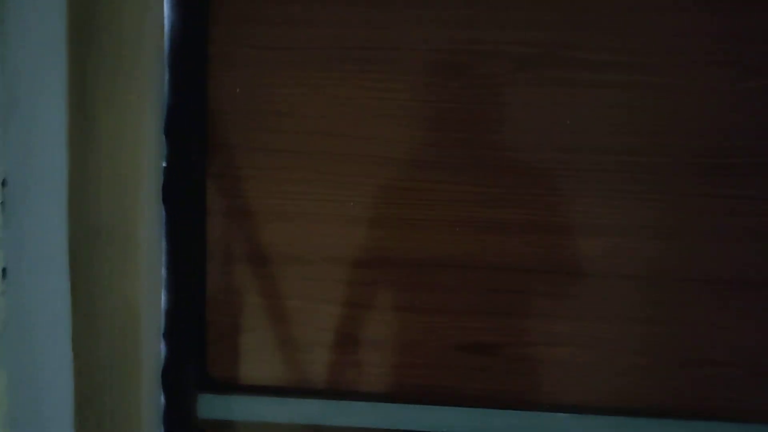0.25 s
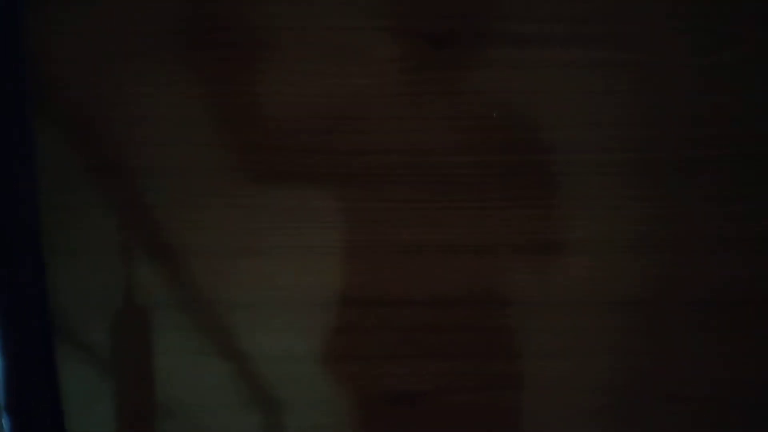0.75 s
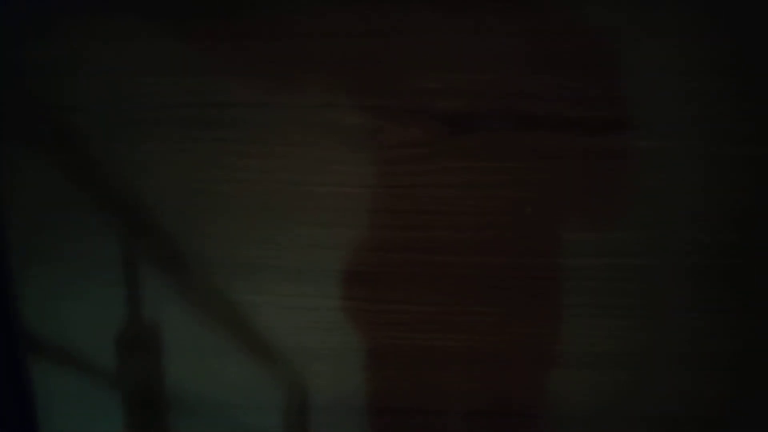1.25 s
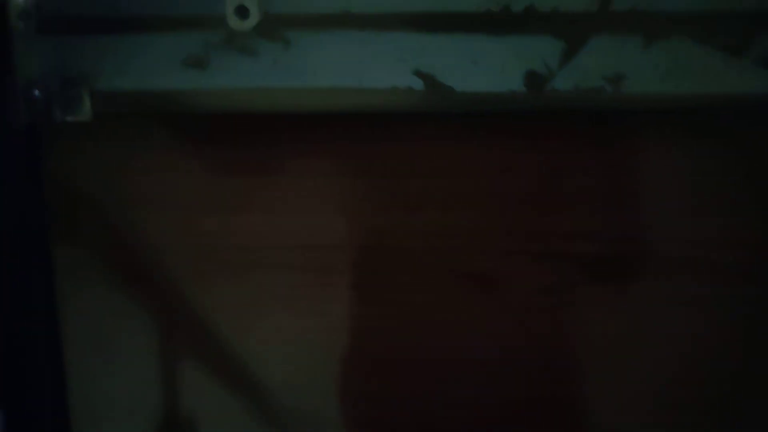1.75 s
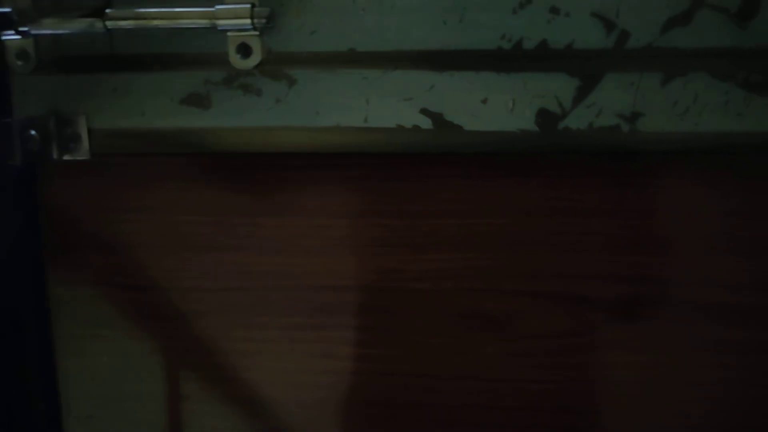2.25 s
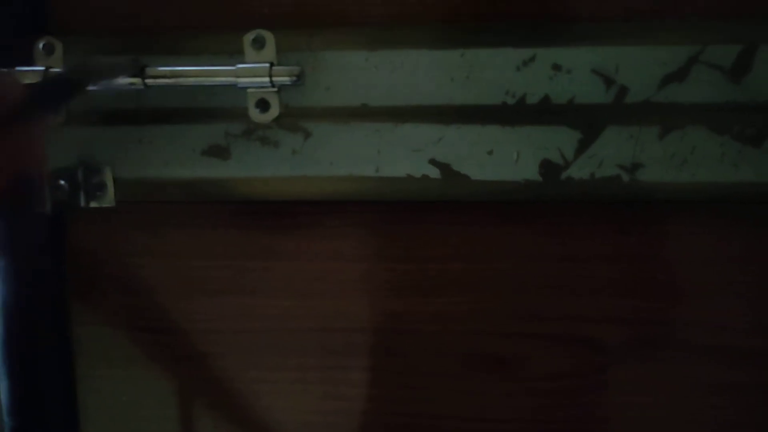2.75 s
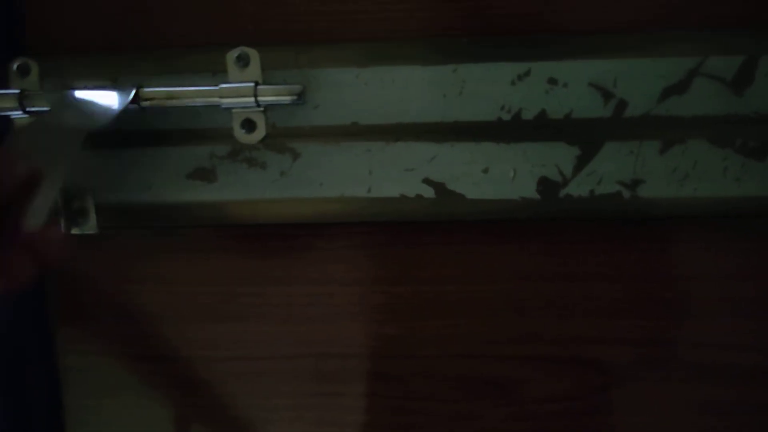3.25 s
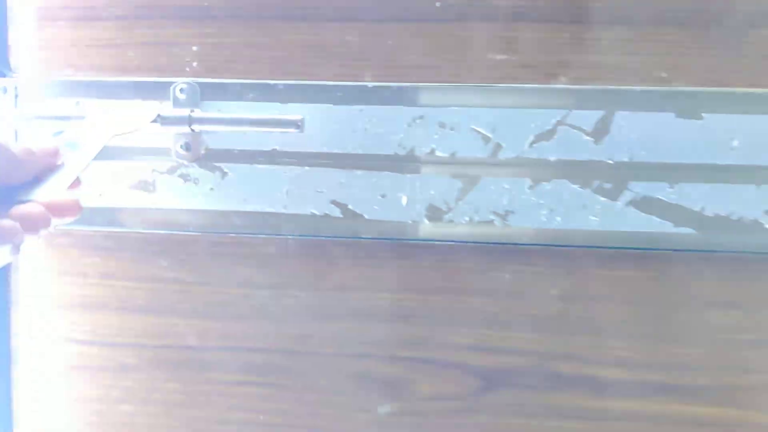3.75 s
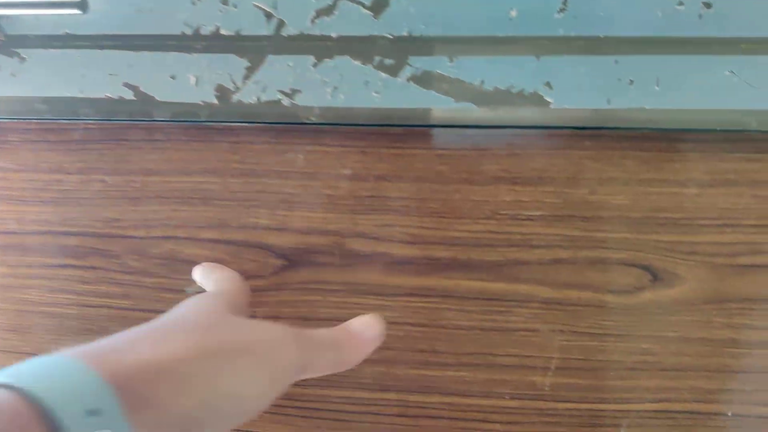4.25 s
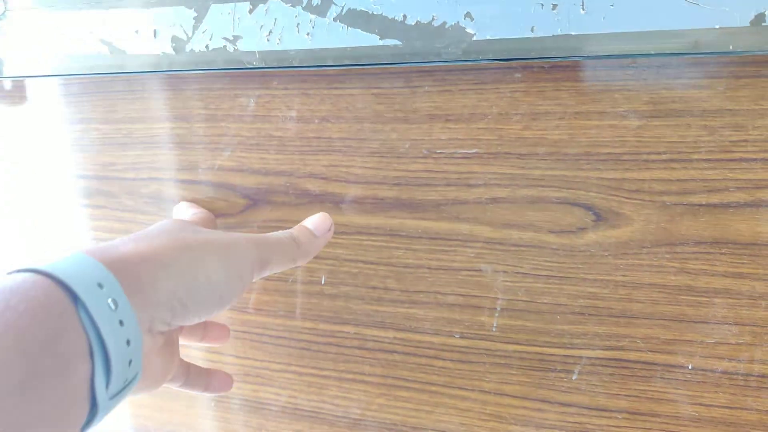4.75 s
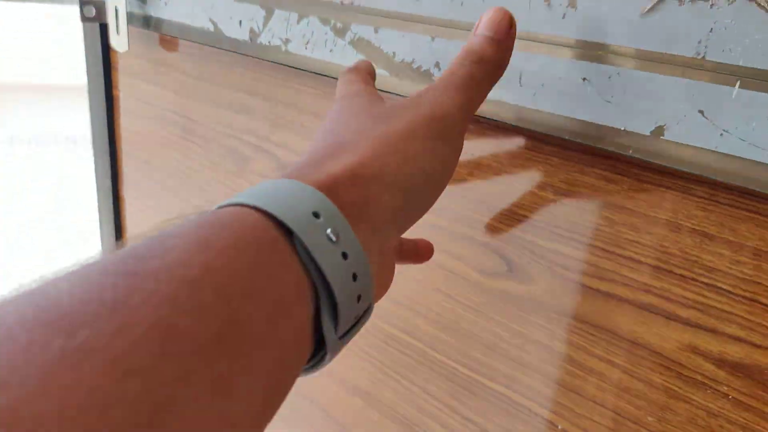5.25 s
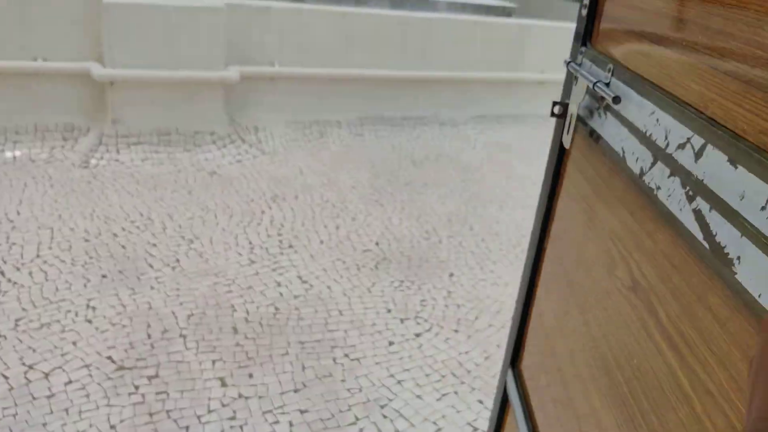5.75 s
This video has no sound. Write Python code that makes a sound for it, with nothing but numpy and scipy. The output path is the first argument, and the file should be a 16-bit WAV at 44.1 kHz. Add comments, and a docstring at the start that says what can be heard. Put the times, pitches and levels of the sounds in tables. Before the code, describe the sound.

Close handheld microphone with low grip rumble and sleeve rustle. Quiet footsteps echo between hard walls, then soft thuds and high metallic squeaks as a stiff bolt is loosened. It shoots back loudly, the wooden panel booming, and a bright metal clack rings afterwards. Uneven wind gusts overload the microphone, shoes scuff, and the steel door clatters at the end.

```python
"""Shoes scuff up the last steps of an echoing stairwell (noise bursts) to a wooden door in a steel frame.
Dull knocks stir the panel and the bolt squeaks (gliding tones) as it is worked loose; it shoots back with
a bang (noise through resonances), and the handle drops and rings (beating sines).
The door swings open: wind hits the close ports of the hand-held microphone (noise and pressure puffs), shoes
scuff again and the steel rattles. A limiter dips the level briefly at each loud peak."""
import sys
import numpy as np
from scipy import signal
from scipy.fft import rfft, irfft, next_fast_len
from scipy.io import wavfile
from scipy.ndimage import uniform_filter1d, minimum_filter1d, map_coordinates

SR = 44100
rng = np.random.default_rng(int(sys.argv[2]) if len(sys.argv) > 2 else 0)


def log_audio(samples):
    """Write samples as a 16-bit WAV file to the path given in sys.argv[1]."""
    # one column per channel
    frames = np.atleast_2d(samples).T
    # limit to full scale, then quantise
    limited = np.clip(frames, -1, 1)
    pcm = np.round(limited * 32767).astype(np.int16)
    wavfile.write(sys.argv[1], SR, pcm)


N = 264644  # length [samples]

# clacks of bolt and frame, and one clunk with the footstep at 4.98 s: (time [s], level [dB], t60 [s],
# resonance of the struck part [Hz], height of that resonance [dB], left over right [dB])
CLACKS = [(3.316, -30, 0.18, 4000, -3, 1), (3.434, -23, 0.18, 6900, -2, -3),
          (3.4441, -3, 0.034, 2800, 3, -3), (3.455, -13.5, 0.07, 2060, 2, 5),
          (3.4797, -5.5, 0.016, 1340, 16, -9), (3.49, 1, 0.025, 9400, 9.5, -2.5),
          (3.892, -26.5, 0.042, 2415, 7, 3), (4.0533, 6.5, 0.0085, 6500, 4, -1.5),
          (4.39, -26, 0.075, 2770, 6.5, 0), (4.7645, -36.5, 0.085, 5330, 31, -1),
          (4.9782, -23.5, 0.12, 1710, 31, -3), (5.8834, -16, 0.09, 1320, 10, 0),
          (5.8905, -7.5, 0.08, 6950, 2, -12), (5.906, -6, 0.051, 4400, 0.5, -5),
          (5.918, -13, 0.023, 4500, -13, -1), (5.9263, 2, 0.024, 2690, 12, -4),
          (5.951, 6.5, 0.011, 3900, 16, -2.5), (5.956, -5.5, 0.015, 5200, 4, -6),
          (5.968, -12, 0.033, 7000, 7, -1)]
# colour of the clacks: (frequency [Hz], level [dB])
STEEL_COLOUR = [(80, 11.5), (400, 7), (900, -2.5), (1600, 2.5), (3200, 3.5), (5500, 1), (8300, 0.5),
                (10500, -8), (15500, -15)]
# modes of the steel door frame: (frequency [Hz], level [dB], t60 [s])
FRAME_MODES = [(687, 0, .16), (965, 4, .11), (1385, -6, .09), (1510, -6, .11), (2320, -4, .13),
               (3085, -5, .09), (3750, -7, .09), (4250, -8, .09), (4950, -9, .08), (5415, -9, .08),
               (7690, -7, .09)]
# light ticks of the loose bolt in its guides: (time [s], level [dB])
TICKS = [(1.107, -43), (3.014, -44), (3.316, -29.5), (3.337, -34), (3.8732, -23), (3.9612, -26),
         (5.631, -23.5)]
# colour of the small part that every tick rings: (frequency [Hz], level [dB])
GUIDE_COLOUR = [(1000, -13), (5000, 2), (6900, 3.5), (9300, -0.5), (11200, -4), (13000, -4), (15500, -16)]
# blows on the bolt's handle: (time [s], level [dB])
HANDLE_BLOWS = [(3.4942, -22), (4.0526, -6.5)]
# handle modes, each a close pair: (frequency [Hz], level [dB], t60 [s], beat [Hz], left over right [dB])
HANDLE_MODES = [(468, -29, .9, 1.4, 0), (2266, -30, .65, 3, 3), (2918, -33, .65, 5.7, 0),
                (3273, -31, .65, 4, 4), (5693, -15, .58, 4.6, 11), (7969, -20.5, .95, 8.1, -12),
                (9661, -23, .7, 6.6, -14)]
# blows that shake the door: (time [s], thump level [dB], boom level [dB], boom t60 [s])
BANGS = [(3.4453, -5, -21.5, 1.03), (3.4908, -1, -22, 2.33), (4.0534, -37, -43, 1.2),
         (5.927, -8, -23, 0.22)]
# dull knocks of hand or heel: (time [s], level [dB], cut-off set by the softness [Hz])
KNOCKS = [(2.066, -21, 2000), (2.553, -25.5, 1490), (2.746, -33, 334), (2.778, -22.5, 1800),
          (2.9605, -26, 1190), (2.986, -26.5, 328), (3.013, -25.5, 1500), (3.311, -26, 900),
          (5.572, -19, 1500)]
# resonances of the door panel: (frequency [Hz], width [Hz], level [dB])
PANEL_MODES = [(160.6, 6.4, 5), (187, 23, 5.5), (254.5, 25, 1.5), (383.4, 10, 6), (432, 48, 1.5),
               (614, 13, 1), (688, 53, 3), (742, 43, 3.5), (830, 23, -7), (1090, 31, -7), (1154, 61, -7),
               (1500, 51, -12), (2380, 160, -14.5)]
# stick-slip squeaks: (centre time [s], pitch [Hz], relative level [dB], half-length [s], pitch jitter [Hz],
# sag [Hz per half-length], left over right [dB], level sent to the room [dB])
SQUEAKS = [(2.168, 9010, -4, 0.0052, 45, 22, -29, -11.5), (2.842, 9120, -38, 0.009, 40, 0, -34, -12),
           (2.988, 5490, -29, 0.007, 100, 160, 14, -10), (3.229, 5450, -18, 0.0038, 69, 110, 20, -11),
           (4.3962, 1639, -12.5, 0.0031, 112, 6, 6, -4)]
# footfalls and scuffs: (time [s], grit level [dB], thud level [dB], t60 [s], slide of the sole [s],
# brightness of the grit [dB per octave], heel tap over the grit [dB])
STEPS = [(0.0, -46.5, -44.5, 0.17, 0, 0, 3), (0.099, -41.5, -48, 0.074, 0, 3, -2),
         (0.577, -29, -49, 0.12, 0.0057, 0.66, 2), (0.625, -40.5, -54, 0.11, 0.023, 6, -3),
         (1.362, -27.5, -27.5, 0.094, 0, -2, 4), (4.974, -33.5, -24, 0.13, 0.022, -1.5, 5),
         (5.151, -37, -67, 0.26, 0.0066, 5.5, -2), (5.586, -31.5, -29, 0.13, 0.007, 1.5, 2)]
# colour of grit, and of the sleeve's rustle: (frequency [Hz], level [dB])
GRIT_COLOUR = [(300, 0.5), (1200, -3), (2300, 0.5), (3200, -0.5), (5400, -0.5), (8300, -3), (10500, -10.5),
               (15500, -21)]
# colour of the dull thuds and knocks: (frequency [Hz], level [dB])
THUD_COLOUR = [(40, -11), (110, 8.5), (450, 2.5), (750, 2), (1000, 0.5), (1500, -3), (2600, -9.5),
               (6000, -23), (15000, -64)]
# gusts through the opening door: (time at full strength [s], hold [s], level [dB], left over right [dB])
GUSTS = [(4.755, 0.041, -30.5, -34), (5.075, 0.011, -27, 19), (5.207, 0.104, -12.5, 24),
         (5.347, 0.056, -7, 35), (5.433, 0.17, -18.5, 12), (5.688, 0.2, -30, 15), (5.89, 0.014, -16, -4)]
# colour of the eddies at the microphone: (frequency [Hz], level [dB])
BUFFET_COLOUR = [(8, -20), (25, 6.5), (70, 2), (140, -1), (260, -8), (450, -17.5), (800, -35), (1500, -67),
                 (4000, -97)]
# hardest eddies popping on the ports: (time [s], level before overload [dB], length [s], left over right [dB])
POPS = [(5.078, -12.5, 0.0032, 29), (5.199, -9.5, 0.0012, 30), (5.2488, -5, 0.0012, 36),
        (5.267, -6, 0.00079, 33), (5.289, -5.5, 0.00068, 32), (5.336, -11, 0.0024, -20),
        (5.343, -11, 0.0007, 30), (5.3595, -4.5, 0.0012, 30), (5.384, -2.5, 0.0014, 30),
        (5.413, -9, 0.00067, 32), (5.598, -6, 0.0027, 14), (5.68, -9, 0.0028, -17),
        (5.701, -16, 0.0012, 19), (5.775, -16, 0.003, 17), (5.79, -14, 0.0025, 20),
        (5.836, -13.5, 0.0017, 23), (5.889, -1.5, 0.0032, -1), (5.916, -12, 0.0049, -17)]
# slow shake of the carrying hand: (time [s], relative level [dB])
MOTION = [(0.0, -47), (0.03, -57), (1.1, -41), (1.27, -34.5), (1.45, -54), (1.59, -24.5), (2.57, -26.5),
          (2.64, -31.5), (3.23, -23), (4.33, -33.5), (4.41, -25), (5.01, -38.5), (5.33, -34), (5.66, -26.5),
          (5.93, -28.5), (6.0, -23)]
# rumble of the grip, strongest while the bolt is worked: (time [s], level [dB])
GRIP = [(0, -38), (.4, -44), (1.2, -41.5), (1.55, -36), (2.45, -35.5), (3, -30.5), (3.45, -31.5),
        (3.8, -38.5), (4.4, -34.5), (5, -43)]
# colour of the grip rumble: (frequency [Hz], level [dB])
RUMBLE_COLOUR = [(15, 0), (28, 0), (45, -1), (70, -5.5), (97, 4), (130, -14.5), (165, -1), (205, -11.5),
                 (270, -8.5), (420, -21.5), (700, -46), (1500, -52), (4000, -63)]
# level sent to the stairwell's echo, falling steadily, then faster near the end: (time [s], level [dB])
ECHO_SEND = [(0, 4.5), (5.2, -5), (5.8, -10)]
# decay of the stairwell: (frequency [Hz], t60 [s])
STAIRWELL_T60 = [(100, 0.25), (500, 1.25), (2000, 1.04), (5500, 0.92), (9000, 0.68), (15000, 0.59)]
# colour of the background air: (frequency [Hz], level [dB])
AIR_COLOUR = [(40, -19), (60, -8), (110, 13), (210, -20), (400, 9), (800, 2), (1400, -6), (2300, -13),
              (3500, -9), (5300, -3), (6800, -24), (8600, -7), (10500, -44), (16000, -43)]
# likeness of the two ports in most noises: (frequency [Hz], correlation [0 to 1])
ALIKE = [(20, 1), (300, 0.89), (700, 0.51), (1500, 0), (5000, 0)]
# treble balance of the microphone ports: (frequency [Hz], left over right [dB])
PORT_BALANCE = [(7000, 1.5), (9000, -27.5), (11000, -8.5), (16000, -5)]

# bolt and frame
CRACK_RISE_S, CRACK_FULL_S = 0.0004, 0.04  # a clack with a t60 below the second rings the frame less
RESONANCE_OCTAVES = 1.13  # half-width of a struck part's resonance
FRAME_DB, FRAME_FOCUS_DB = -25, 10  # frame under the clack; lift of modes near the struck part's resonance
TICK_T60_S, TICK_PAN_DB = 0.026, -8  # to the right
TWIN_SHARE = 0.75  # weaker mode of each handle pair
# door
CHATTER_DB, CHATTER_RATE = 2, 130  # the booming panel chatters in its frame: depth, changes a second
KNOCK_CYCLES = 50  # t60 in cycles of the cut-off: a softer knock lasts longer
KNOCK_BOOM_DB = -36  # each knock stirs the panel alike
# squeaks
SQUEAK_LEAD_DB, SQUEAK_LEAD_S = -17.5, 0.015  # a faint whistle leads into each squeak
OVERTONE_SHARE = 0.15
# footsteps
HEEL_LEAD_S, HEEL_T60_S = 0.0155, 0.062  # the heel taps just before the sole
SOLE_RISE_S = 0.00027
GRIT_GRAIN_DB, GRIT_GRAIN_RATE = 3, 600  # depth, changes a second
# wind
GUST_ATTACK_S, GUST_RELEASE_S = 0.009, 0.032
DRAUGHT_FROM_S, DRAUGHT_RISE_S, DRAUGHT_DB = 4.86, 0.45, -39  # steady flow as the door opens
EDDY_SWELL_DB = 2.8
PUFFS_PER_S, PUFF_S, PUFF_SPREAD, PUFF_DB = 55, 0.0012, 0.31, 2  # length in a strong gust, its log spread
STRONG_GUST_DB = -8
PUFF_SLOWS = 0.49  # a weaker flow carries its eddies past more slowly, by this power of its strength
PORT_OVERLOAD_DB = 3  # the wind's pressure flattens out here
# hand on the microphone
TREMOR_HZ, TREMOR_WANDER_HZ, TREMOR_DB = 15.3, 2.5, 2
JOLT_SHARE = 0.22  # random jolts in the shake
GRIP_SWELL_DB, RUSTLE_SWELL_DB = 1.6, 1.8
USUAL_MOTION_DB = -27
SLEEVE_DB, SLEEVE_FOLLOWS = -46, 0.29  # rustle at the usual motion; dB more per dB of movement
TOP_HZ = 16200  # band limit of the recorder


def amp(db):
    """Amplitude of a level in dB."""
    return 10 ** (np.asarray(db) / 20)


def unit(x):
    """x scaled to an rms of 1."""
    return x / np.sqrt(np.mean(x ** 2) + 1e-20)


def along(points, hz):
    """Interpolate (Hz, value) points on a log axis."""
    f, v = np.transpose(points)
    return np.interp(np.log(hz + 1), np.log(f + 1), v)


def curves(rows):
    """One value per sample for each column after the time."""
    s, *cols = np.transpose(rows)
    return np.array([np.interp(np.arange(N) / SR, s, c) for c in cols])


def wobble(rate, size=N):
    """A smooth random curve, rate knots a second."""
    knots = rng.standard_normal(size // 20)
    return map_coordinates(knots, [np.arange(size) * rate / SR], order=2, mode="wrap")


def colour(points):
    """Gain against frequency for (Hz, dB) points."""
    return lambda hz: amp(along(points, hz))


def decay(t, t60):
    """Exponential fall of 60 dB in t60 seconds."""
    return np.exp(-np.log(1000) * t / t60)


def noise(gain, size=N, alike=ALIKE):
    """Coloured stereo noise of rms 1, as alike at the two close ports as the likeness curve says."""
    hz = np.fft.rfftfreq(size, 1 / SR)
    turn = np.arccos(np.clip(along(alike, hz), -1, 1)) / 2
    random_phase = np.exp(2j * np.pi * rng.random((2, len(hz))))
    mid, side = irfft(random_phase * gain(hz) * [np.cos(turn), np.sin(turn)], size)
    return unit(np.array([mid + side, mid - side]))


def burst(gain, rise, t60, size=SR // 2, hold=0):
    """Coloured noise that swells, holds and dies away."""
    t = np.arange(size) / SR
    return noise(gain, size) * (1 - np.exp(-t / rise)) * decay(np.maximum(t - hold, 0), t60)


def pan(db):
    """Left and right gains of constant power."""
    return unit(amp([[db / 2], [-db / 2]]))


def add(track, s, sound):
    """Mix a sound in from time s."""
    part = track[:, max(round(s * SR), 0):][:, :sound.shape[-1]]
    part += sound[..., :part.shape[1]]


def filtered(x, gain):
    """x times a gain against frequency."""
    m = next_fast_len(N + SR // 2)
    return irfft(rfft(x, m) * gain(np.fft.rfftfreq(m, 1 / SR)), m)[:, :N]


def bolt():
    """Clacks and a clunk ring the frame (a brief one rings it less); light ticks as the bolt shifts in its guides."""
    out = np.zeros((2, N))
    for s, db, t60, centre_hz, height_db, pan_db in CLACKS:
        add(out, s, amp(db) * pan(pan_db) * crack(t60, centre_hz, height_db))
        add(out, s, amp(db + FRAME_DB) * min(1, t60 / CRACK_FULL_S) * frame_ring(centre_hz))
    for s, db in TICKS:
        add(out, s, amp(db) * pan(TICK_PAN_DB) * burst(colour(GUIDE_COLOUR), CRACK_RISE_S, TICK_T60_S))
    return out


def crack(t60, centre_hz, height_db):
    """One hard contact: a noise burst in the resonance of the part it strikes."""
    def gain(hz):
        return colour(STEEL_COLOUR)(hz) * struck_part(hz, centre_hz, height_db)
    return burst(gain, CRACK_RISE_S, t60, size=SR // 5)


def struck_part(hz, centre_hz, height_db):
    """Gain of the broad resonance of the part that is struck."""
    octaves = np.log2((hz + 1) / centre_hz)
    return amp(height_db * np.exp(-(octaves / RESONANCE_OCTAVES) ** 2))


def frame_ring(centre_hz):
    """Decaying frame modes, lifted near the struck part's resonance; strength and phase vary by blow and port."""
    t = np.arange(SR // 3) / SR
    ring = 0
    for hz, db, t60 in FRAME_MODES:
        strength = struck_part(hz, centre_hz, FRAME_FOCUS_DB) * amp(db + 2 * rng.standard_normal((2, 1)))
        ring = ring + strength * decay(t, t60) * np.sin(2 * np.pi * (hz * t + rng.random((2, 1))))
    return ring


def handle():
    """Blows ring the bolt's handle; each mode beats with a weaker twin, so it fades and swells again."""
    out, t = np.zeros((2, N)), np.arange(SR) / SR
    for s, db in HANDLE_BLOWS:
        for hz, mode_db, t60, beat_hz, pan_db in HANDLE_MODES:
            phase = 2 * np.pi * (hz * t + rng.random((2, 1)))  # each port hears it out of step
            pair = np.sin(phase) + TWIN_SHARE * np.sin(phase + 2 * np.pi * beat_hz * t)
            add(out, s, amp(db + mode_db) * pan(pan_db) * pair * decay(t, t60))
    return out


def door():
    """The panel thumps and booms under the blows; dull knocks stir mostly its low modes."""
    out = np.zeros((2, N))
    for s, thump_db, boom_db, t60 in BANGS:
        add(out, s, amp(thump_db) * burst(panel, 0.00005, 0.019))
        chatter_db = CHATTER_DB * wobble(CHATTER_RATE, size=2 * SR)
        add(out, s, amp(boom_db + chatter_db) * burst(panel, 0.00047, t60, size=2 * SR))
    for s, db, soft_hz in KNOCKS:
        def soft_thud(hz):
            return colour(THUD_COLOUR)(hz) / np.hypot(1, (hz / soft_hz) ** 2)
        add(out, s, amp(db) * burst(soft_thud, 0.00069, KNOCK_CYCLES / soft_hz))
        add(out, s, amp(KNOCK_BOOM_DB) * burst(lambda hz: panel(hz) / (1 + (hz / 420) ** 2), 0.0027, 0.3))
    return out


def panel(hz):
    """Gain of the door panel: the power sum of its resonances."""
    power = sum(amp(db) ** 2 / (1 + ((hz * hz - c * c) / (hz * w + 1)) ** 2) for c, w, db in PANEL_MODES)
    return np.sqrt(power)


def squeaks():
    """Dry metal sticks and slips in short tones, most sagging in pitch; returned at the ports and as sent to the room."""
    near, sent = np.zeros((2, N)), np.zeros((2, N))
    t = np.arange(-SR // 10, SR // 10) / SR
    for s, hz, db, half, jitter_hz, sag_hz, pan_db, room_db in SQUEAKS:
        pitch = hz - sag_hz * np.clip(t / half, 0, 2) + jitter_hz * wobble(900, size=len(t))
        phase = 2 * np.pi * np.cumsum(pitch) / SR
        overtones = sum(np.sin(k * phase) / (1 + (k * hz / 3000) ** 2) for k in range(2, 6) if k * hz < TOP_HZ)
        lead = amp(SQUEAK_LEAD_DB) * np.exp(-2 * (t / SQUEAK_LEAD_S + 1) ** 2)
        swell = 1 / np.cosh(t / half) + lead
        tone = (np.sin(phase) + OVERTONE_SHARE * overtones) * amp(db - 4) * swell
        add(near, s + t[0], pan(pan_db) * tone)
        add(sent, s + t[0], amp(room_db) * tone)
    return near, sent


def footsteps():
    """The heel taps, then the sole slides over grit on the stone and thuds under the weight."""
    out = np.zeros((2, N))
    for s, grit_db, thud_db, t60, slide, tilt_db, heel_db in STEPS:
        def grit(hz):
            return amp(along(GRIT_COLOUR, hz) + tilt_db * np.log2(np.maximum(hz, GRIT_COLOUR[0][0])))
        add(out, s - HEEL_LEAD_S, amp(grit_db + heel_db) * burst(grit, 0.0021, HEEL_T60_S))
        add(out, s, amp(grit_db) * burst(grit, SOLE_RISE_S, t60, hold=slide))
        add(out, s, amp(thud_db) * burst(colour(THUD_COLOUR), SOLE_RISE_S, t60))
    return out * amp(GRIT_GRAIN_DB * wobble(GRIT_GRAIN_RATE))


def wind():
    """Eddies and puffs buffet the two close ports; puffs are shorter in a strong gust, and the ports overload."""
    flow = airflow()
    swell_db = EDDY_SWELL_DB * np.array([wobble(50), wobble(50)])
    eddies = amp(swell_db) * noise(colour(BUFFET_COLOUR), alike=[(30, 0.73)])
    puffs = np.zeros((2, N))
    for k, (early, stretch, side) in enumerate(rng.standard_normal((N // SR * 100, 3))):
        s = N / SR - (k + early / 2) / PUFFS_PER_S  # laid out from the end backwards
        left_flow = flow[0, np.clip(round(s * SR), 0, N - 1)]
        strength = np.clip(left_flow / amp(STRONG_GUST_DB), 0.05, 1)
        length = PUFF_S * np.exp(PUFF_SPREAD * stretch) / strength ** PUFF_SLOWS
        add(puffs, s, pan(6 * side) * puff(length))
    pressure = flow * (eddies + amp(PUFF_DB) * puffs)
    for s, db, length, pan_db in POPS:
        add(pressure, s, amp(db) * pan(pan_db) * puff(length))
    return amp(PORT_OVERLOAD_DB) * np.tanh(pressure / amp(PORT_OVERLOAD_DB))


def airflow():
    """Strength of the wind at each port: a growing draught, and gusts that rise, hold and die away."""
    t = np.arange(N) / SR
    flow = amp(DRAUGHT_DB) * np.clip((t - DRAUGHT_FROM_S) / DRAUGHT_RISE_S, 0, 1) ** 2
    for s, length, db, pan_db in GUSTS:
        rise = np.clip(1 + (t - s) / GUST_ATTACK_S, 0, 1)
        fall = np.exp(-np.maximum(t - s - length, 0) / GUST_RELEASE_S)
        flow = np.hypot(flow, amp(db) * pan(pan_db) * rise * fall)
    return flow


def puff(length):
    """One eddy: a push of air, then a weaker suck."""
    u = np.arange(SR // 20) / SR * 2 / length
    return u ** 3 * (1 - u / 4) * np.exp(1 / 2 - u)


def handling():
    """The carrying hand trembles and rumbles, and the sleeve rustles the more it moves."""
    motion_db = curves(MOTION)
    phase = 2 * np.pi * np.cumsum(TREMOR_HZ + TREMOR_WANDER_HZ * wobble(47)) / SR
    shake = np.sin(phase) + 0.13 * np.sin(2 * phase) + JOLT_SHARE * wobble(90)
    sway = amp(motion_db + TREMOR_DB) * pan(0.92) * shake
    grip = amp(curves(GRIP) + GRIP_SWELL_DB * wobble(16)) * pan(0.26) * noise(colour(RUMBLE_COLOUR))
    sleeve_db = SLEEVE_DB + SLEEVE_FOLLOWS * (motion_db - USUAL_MOTION_DB)
    rustle_db = RUSTLE_SWELL_DB * wobble(21.1) + 0.75 * wobble(250)
    sleeve = amp(sleeve_db + rustle_db) * pan(-1.9) * noise(colour(GRIT_COLOUR))
    return sway + grip + sleeve


def stairwell(x):
    """Hard walls answer with a noise tail that lasts longest in the middle of the spectrum."""
    hz, t, z = signal.stft(noise(np.ones_like, size=3 * SR // 2), SR, nperseg=256)
    fading = z * decay(t, along(STAIRWELL_T60, hz)[:, None])
    tail = signal.istft(fading, SR, nperseg=256)[1]
    tail = tail * (1 - np.exp(-np.arange(tail.shape[1]) / SR / 0.0024))  # soft onset
    return signal.fftconvolve(x, tail / np.linalg.norm(tail[0]), axes=1)[:, :N]


def background_air():
    """Steady coloured noise behind everything."""
    return amp(-46.5) * noise(colour(AIR_COLOUR))


def scene():
    """Sum the direct sounds, the stairwell's answer and the noises at the microphone."""
    steps, steel, wood = footsteps(), bolt(), door()
    squeak, squeak_sent = squeaks()
    sent = amp(4.0) * steps + amp(-2.0) * steel + amp(-5.0) * wood + squeak_sent
    room = stairwell(amp(curves(ECHO_SEND)) * sent)
    direct = steps + steel + handle() + pan(0.86) * wood + squeak
    return direct + room + handling() + wind() + background_air()


def ports(hz):
    """Left and right gains of the two microphone ports, of constant power."""
    left = amp(along(PORT_BALANCE, hz))
    return np.array([left, np.ones_like(left)]) / np.sqrt((1 + left ** 2) / 2)


def limiter(x, ceiling_db, hold):
    """Each channel's gain drops at once on a peak, holds, then springs back."""
    size = int(np.clip(hold, 0.01, 0.3) * SR) // 2 * 2 + 1
    needed = np.minimum(1, amp(ceiling_db) / (np.abs(x) + 1e-9))
    held = minimum_filter1d(needed, size, axis=1, origin=size // 2)
    gain = uniform_filter1d(minimum_filter1d(held, size=65, axis=1), size=65, axis=1)
    return x * gain


def record(dry):
    """The ports colour the treble; the recorder limits peaks and keeps nothing above its band limit."""
    limited = limiter(filtered(dry, ports), ceiling_db=-2.0, hold=0.0957)
    return filtered(limited, lambda hz: hz < TOP_HZ)


dry = scene()
out = record(dry)
log_audio(out)
```